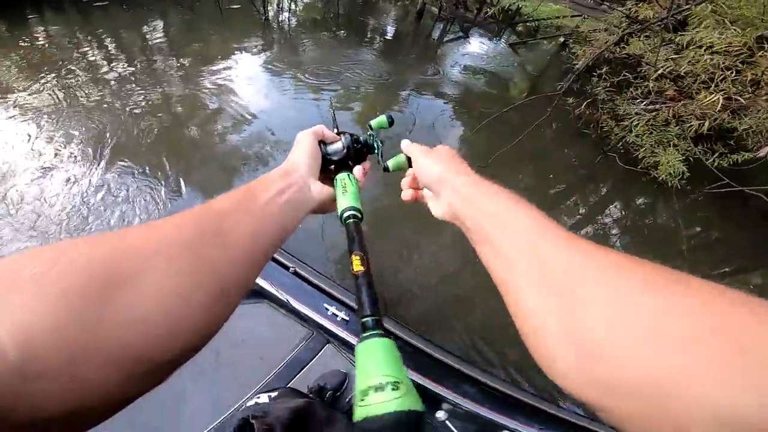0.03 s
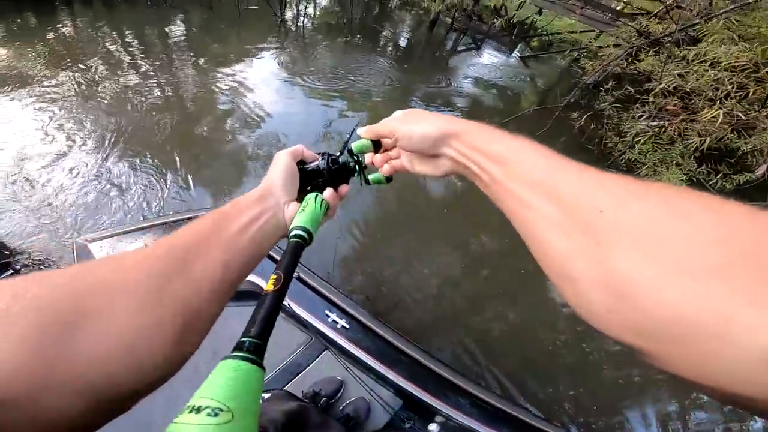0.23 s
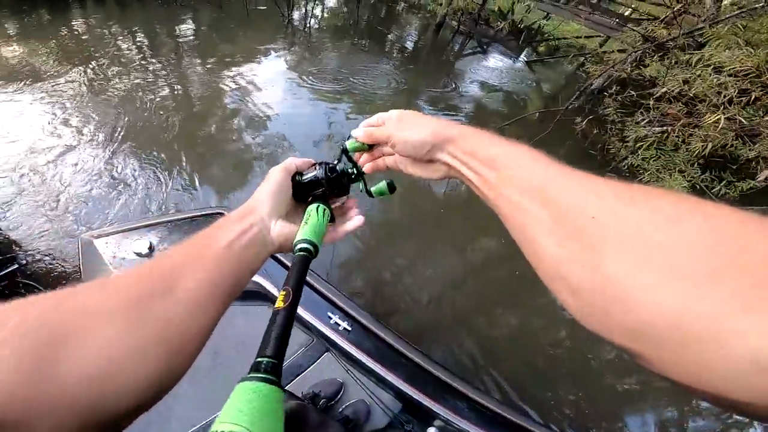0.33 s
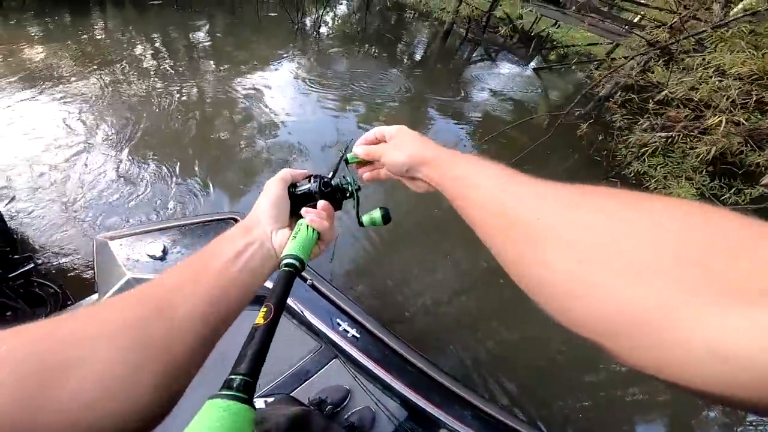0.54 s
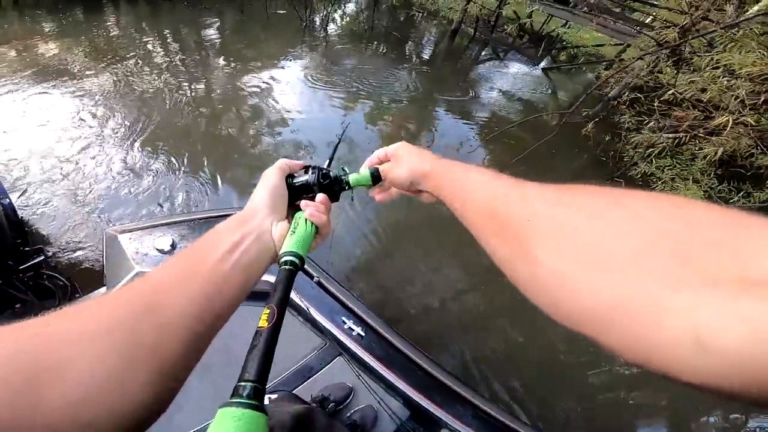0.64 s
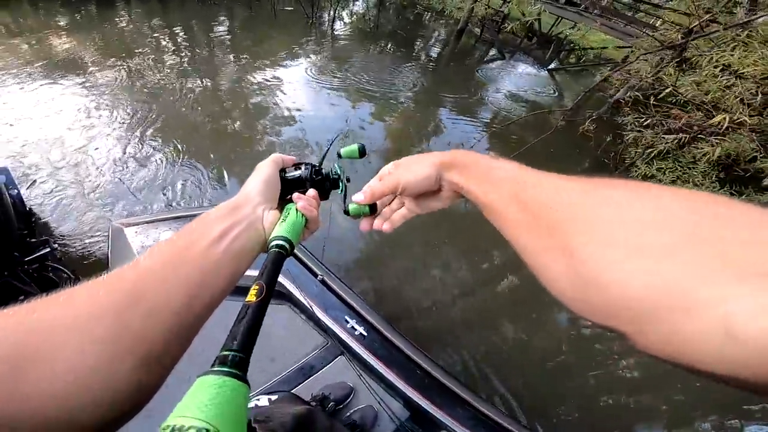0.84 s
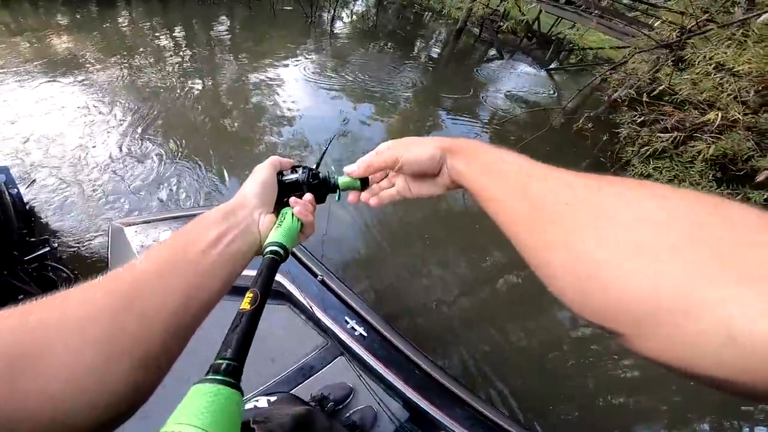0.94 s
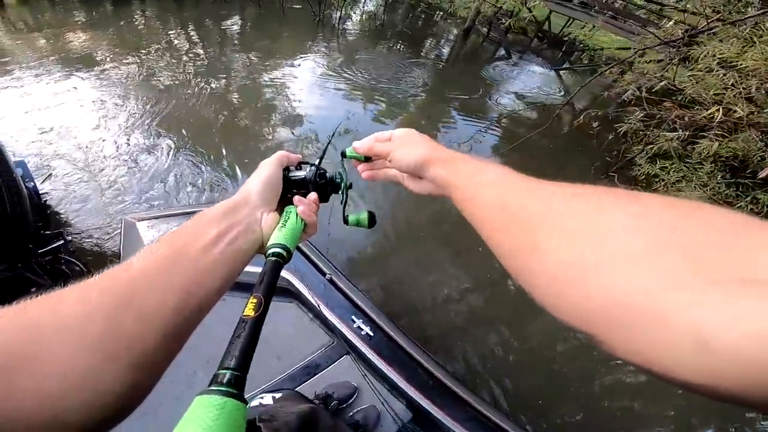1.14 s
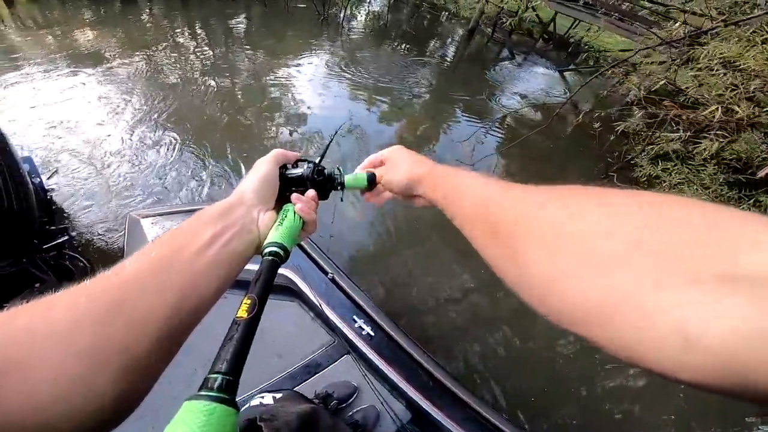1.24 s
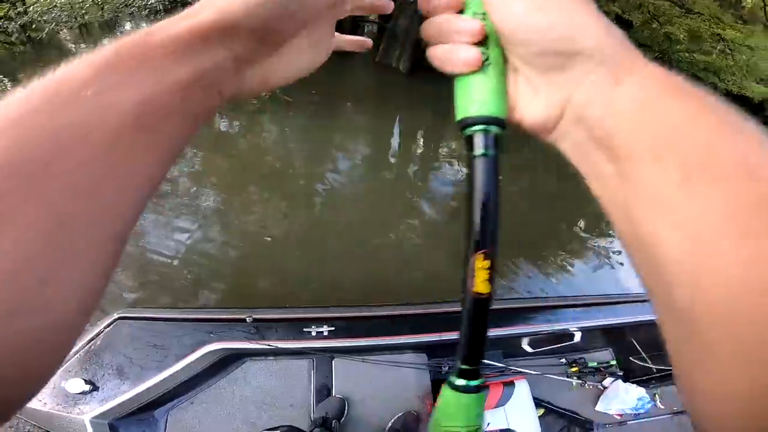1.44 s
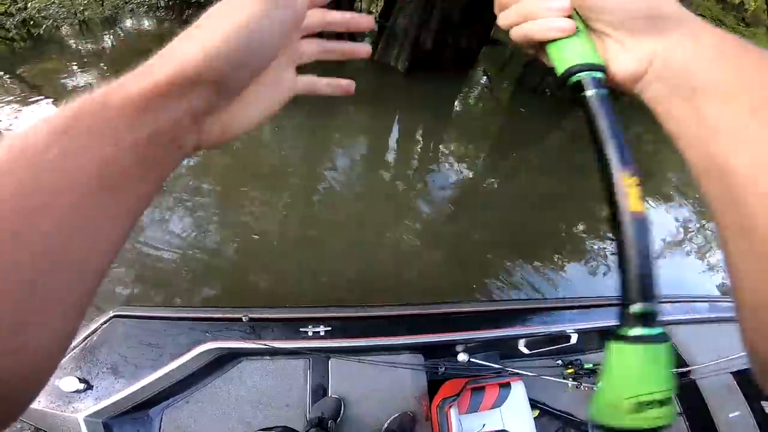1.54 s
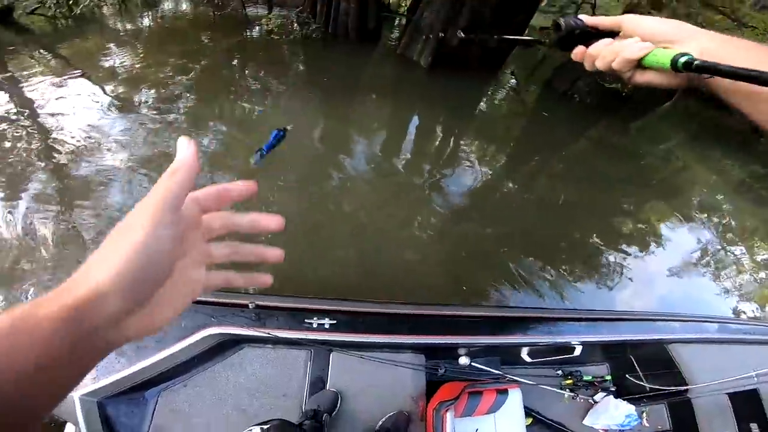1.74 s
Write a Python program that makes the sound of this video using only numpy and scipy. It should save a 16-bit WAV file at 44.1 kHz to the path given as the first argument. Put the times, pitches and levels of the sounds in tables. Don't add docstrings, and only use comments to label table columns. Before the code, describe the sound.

Fishing reel and rod handling, close and dry. A small click and plastic scrape at 0.12 s, a loud metallic clutch snap at 0.24, then a duller knock with a low thump at 0.30. Faint line ticks and tiny water blips follow from 0.7 to 1.4, with soft hand rubbing near 1.35. A hard lure clacks and rattles at 1.49. Underneath: very quiet hum, cloth rustle, distant cicadas, cricket trills from 0.87.

```python
import sys
import numpy as np
from scipy import signal
from scipy.fft import rfft, irfft, next_fast_len
from scipy.io import wavfile
from scipy.ndimage import uniform_filter1d, map_coordinates

SR = 44100
rng = np.random.default_rng(int(sys.argv[2]) if len(sys.argv) > 2 else 0)


def wav_record(signal):
    frames = np.transpose(np.atleast_2d(signal))
    bounded = np.clip(frames, -1, 1)
    quanta = np.round(bounded * 32767).astype(np.int16)
    wavfile.write(sys.argv[1], SR, quanta)


def to_linear_factor(level_db):
    exponent = np.asarray(level_db, float) / 20
    return 10 ** exponent


N = 77175

# f/Hz, likeness (1 = same in both)
LIKENESS = [(60, 0.26), (250, 0.27), (600, -.4), (1500, -0.07), (3500, 0.72), (9000, -0.036)]
# f/Hz, level/dB
MIC_RESPONSE = [(9000, -0.5), (12500, -3), (15600, 3), (16500, -36.5)]
# f/Hz, level/dB per Hz
AIR_COLOUR = [(200, -4.5), (570, -16), (5400, -16), (9000, -17.5), (11400, -36)]
# f/Hz, level/dB per Hz
RUMBLE_COLOUR = [(20, -2), (60, -1), (110, -1)]
# t/s, level/dB
SLEEVE_LEVEL = [(0, -48.5), (.05, -61.5), (.1, -60), (.2, -63), (.27, -57), (.38, -64), (.47, -73.5),
                (.68, -68.5), (.8, -62), (.98, -63.5), (1.15, -63), (1.33, -60), (1.45, -59.5),
                (1.56, -64.5), (1.66, -70.5), (1.75, -72.5)]
# f/Hz, level/dB per Hz
CLOTH_COLOUR = [(300, -5.5), (1050, -1), (1600, 1.5), (2300, -2), (4200, -3), (6000, -13), (10000, -11.5),
                (13500, -31.5)]
# t/s, level/dB
HUM_LEVEL = [(0, -56.5), (.2, -62.5), (.32, -59), (.41, -61), (.49, -67), (.6, -65), (.74, -70.5),
             (.87, -71.5), (.96, -61), (1.06, -65.5), (1.24, -65), (1.32, -74.5), (1.38, -54),
             (1.53, -57.5), (1.62, -56), (1.75, -65.5)]
# f/Hz, level/dB
HULL_TONES = [(77, -17.5), (154, 0.5)]
# f/Hz, level/dB per Hz
DRONE_COLOUR = [(170, -2), (270, -7), (400, -18), (800, -15)]
# t/s, level/dB
CHORUS_LEVEL = [(0, -57), (1.37, -58), (1.75, -64)]
# f/Hz, width/Hz, level/dB
CICADA_BANDS = [(6828, 610, 4), (7530, 440, -4.5)]
# first pulse t/s, last pulse t/s, peak level/dB, f/Hz
CRICKET_PHRASES = [(0.871, 0.939, -65, 4220), (0.971, 1.085, -64, 4210), (1.122, 1.172, -63, 4310),
                   (1.187, 1.241, -61.5, 4260), (1.265, 1.335, -58.5, 4280), (1.355, 1.479, -57.5, 4350),
                   (1.527, 1.582, -60.5, 4370), (1.598, 1.652, -57.5, 4380), (1.684, 1.754, -58, 4300)]
# t/s, peak level/dB, first f/Hz, last pitch over first, length/s
WATER_DROPS = [(0.724, -64, 1536, 0.856, .025), (0.789, -67.5, 883, 2.1, 0.096),
               (1.073, -63.5, 906, 0.91, 0.026), (1.147, -59.5, 774, 2.93, 0.0294),
               (1.544, -57.5, 1002, 1.07, 0.025), (1.468, -55, 1700, 1.02, .009),
               (1.476, -46, 1600, 1.08, .009), (1.484, -48, 1680, 1.01, .01),
               (1.503, -47.5, 640, 1.02, .012)]
# t/s, peak level/dB, f/Hz, time to fall 60 dB/s
BODY_BUMPS = [(0.245, -44, 58, 0.16), (0.298, -33.5, 77.7, 0.067), (.300, -24, 194, 0.016),
              (0.746, -58, 36, 0.13), (1.0, -49, 32, 0.082), (1.211, -55, 74.5, 0.51),
              (1.259, -43.5, 51.7, 0.13), (1.582, -58.5, 80, 0.23), (0.241, -38, 200, 0.06),
              (.245, -39.5, 270, .03), (.1, -61, 45, .2), (0.162, -59, 52, 0.16)]
# t/s, level/dB
RUB_LEVEL = [(1.22, -85), (1.28, -68.5), (1.33, -59), (1.37, -60.5), (1.385, -75), (1.4, -57),
             (1.43, -66.5), (1.45, -87)]
# t/s, level/dB, time to fall 60 dB/s, centre f/Hz
SCRAPES = [(.1245, -48, 0.066, 2500), (0.1307, -40.5, 0.044, 3170), (0.144, -47, 0.026, 3100),
           (0.14, -57, .05, 3024), (1.9, -61, 0.018, 4630), (2.2, -56.5, .02, 3400),
           (.2210, -44, 0.019, 3290), (.2235, -46.5, 0.026, 3600), (.2315, -56.5, 0.042, 3000),
           (0.246, -31, 0.018, 2980), (.25, -54, 0.22, 9000), (.259, -46, 0.041, 3000),
           (0.274, -57, 0.11, 4000), (0.294, -45, 0.034, 2300), (1.324, -54, 0.07, 2800),
           (.131, -50, 0.082, 690), (1.41, -59, 0.067, 705), (1.456, -47, 0.019, 3300),
           (1.4649, -39.5, 0.018, 2600), (1.4843, -35, 0.025, 2800), (1.498, -39.5, 0.06, 2200),
           (1.31, -63, 0.095, 240), (.81, -58.5, 0.066, 260)]
# t/s, peak level/dB; the first line row at 0.2423 s is a bright click leading into the
LINE_HITS = [(.2423, -10.5), (.794, -40.5), (.835, -36.5), (.903, -45.5), (.914, -38), (.946, -38.5),
             (1.038, -40), (1.282, -47), (1.268, -47), (1.340, -39), (1.390, -41)]
TAP_HITS = [(.1428, -36), (.1737, -44.5), (.2320, -32.5), (1.0945, -38), (1.3255, -45.5), (1.4649, -42)]
PAWL_HITS = [
    (.1229, -20.5),
]
MOUNT_HITS = [
    (.2991, -15),
    (.3008, -26),
    (.9230, -42),
    (1.3960, -39),
]
LURE_HITS = [
    (1.4846, -32.5),
    (1.4949, -8.5),
    (1.4955, -3.5),
    (1.4980, -18.5),
    (1.5004, -19.5),
]
CLUTCH_HITS = [
    (.2412, -19.5),
    (.2419, -21),
    (.2436, -3.5),
    (.2441, 0.5),
    (.2454, -24),
    (.2472, -31),
    (.2493, -28),
]
# f/Hz, level/dB, time to fall 60 dB/s
LINE_TONES = [(4220, 2.5, 0.0038), (6120, 6.5, 0.0026), (8760, 15, 0.0019), (11340, -12.5, 0.03)]
TAP_TONES = [(1530, -1.5, .008), (2200, -2.5, 0.016), (2900, -1, 0.0029), (3600, -1, .005),
             (4700, -6.5, .003)]
PAWL_TONES = [(1385, -16.5, 0.035), (2610, 3, 0.0086), (3600, 7, 0.0024), (4300, 13, 0.0028),
              (5940, 1, 0.0027)]
MOUNT_TONES = [(1310, -3.5, 0.034), (1630, 6, 0.0097), (2570, -4, 0.01), (2930, -5.5, 0.012),
               (3900, 5.5, 0.0036), (4900, 6, 0.0038), (7400, -3, 0.0036)]
LURE_TONES = [(650, -8, 0.01), (740, -31.5, 0.1), (850, -22.5, 0.0028), (1061, -31.5, 0.055),
              (1590, -39.5, 0.1), (1787, -9, 0.0067), (2630, -19.5, .012), (3356, 11, 0.0031),
              (3710, -14, 0.028), (4910, -5, 0.0038), (7233, -9.5, 0.02), (8850, -0.5, 0.0051),
              (10480, -5.5, 0.005), (14000, -15, 0.0033)]
CLUTCH_TONES = [(741, -35, 0.087), (1390, -22.5, 0.026), (2010, -12.5, 0.009), (2490, -14, 0.01055),
                (3000, -8.5, 0.015), (3900, -1, 0.0076), (4730, 14, 0.0043), (5200, 5.5, 0.0039),
                (7040, 6, 0.0047), (9290, -4, 0.0036), (13840, -6.5, 0.004)]


def unit(x):
    return x / np.sqrt(np.mean(x ** 2) + 1e-20)


def along(points, hz):
    f, v = np.transpose(points)
    return np.interp(np.log(hz + 1), np.log(f + 1), v)


def closed(points):
    low_end, high_end = (points[0][0] / 2, -60), (points[-1][0] * 1.2, -90)
    return lambda f: to_linear_factor(along([low_end] + list(points) + [high_end], f))


def bell(f, centre_hz, width_hz):
    return 1 / (1 + (2 * (f - centre_hz) / width_hz) ** 2)


def curve(rows):
    return np.interp(np.arange(N) / SR, *np.transpose(rows))


def wobble(rate):
    knots = rng.standard_normal(int(N * rate / SR) + 4)
    return map_coordinates(knots, [np.arange(N) * rate / SR])


def two_sides(angle):
    return np.array([[angle], [-angle]])


def add(out, s, sound):
    part = out[:, round(s * SR):][:, :sound.shape[-1]]
    part += sound[..., :part.shape[1]]


def rush(gain, patchy_db):
    z = signal.stft(rng.standard_normal((2, N)), nperseg=256)[2]
    field = uniform_filter1d(rng.standard_normal(z.shape[1:]), 4, 0)
    field = uniform_filter1d(field, 8, 1)
    pair = signal.istft(z * to_linear_factor(patchy_db * unit(field)), nperseg=256)[1][:, :N]
    m = next_fast_len(N + 8192)
    hz = np.fft.rfftfreq(m, 1 / SR)
    turn = np.arccos(np.clip(along(LIKENESS, hz), -1, 1)) / 2
    shares = [np.cos(turn), np.sin(turn)]
    mid, side = irfft(rfft(pair, m) * gain(hz) * shares, m)[:, :N]
    return unit(np.array([mid + side, mid - side]))


def struck(contacts, modes, turn, lag_s, pan_db, crack, attack_s, bass_hz, dull=False):
    out, t = np.zeros((2, N)), np.arange(SR // 8) / SR
    hz, db, t60 = np.transpose(modes)[:, :, None]
    signs = (-1) ** np.arange(len(modes))[:, None]
    chance = rng.standard_normal((len(contacts), 3, len(modes), 1))
    snaps = uniform_filter1d(rng.standard_normal((len(contacts), 2, len(t))), size=3)
    for (s, peak_db), (size, tune, skew), snap in zip(contacts, chance, snaps):
        apart = (turn + 2 * np.pi * hz * lag_s * (1 + 0.69 * skew)) / 2
        phase = 2 * np.pi * hz * (1 + 0.008 * tune) * t
        shape = signs * to_linear_factor(db + size - 60 * t / t60) * (1 - np.exp(-t / attack_s))
        ring = np.array([(shape * np.sin(phase + side * apart)).sum(0) for side in (1, -1)])
        ring = ring / np.abs(ring).max()
        add(out, s, to_linear_factor(peak_db) * (ring + crack * to_linear_factor(-60 * t / 0.031) * snap))
    out = signal.sosfilt(signal.butter(2, bass_hz, 'high', fs=SR, output='sos'), out)
    if dull:
        out = signal.sosfilt(signal.butter(2, 12200, fs=SR, output='sos'), out)
    return out * to_linear_factor([[pan_db / 2], [-pan_db / 2]])


def air():
    return to_linear_factor(-68.5) * rush(closed(AIR_COLOUR), patchy_db=5.0)


def wind_rumble():
    return to_linear_factor(-79.5 + 4.0 * wobble(36.0)) * rush(closed(RUMBLE_COLOUR), patchy_db=0.5)


def hull_hum():
    t = np.arange(N) / SR
    tones = 0
    for hz, db in HULL_TONES:
        level = to_linear_factor(db + 2.7 * wobble(21))
        tones = tones + level * np.sin(2 * np.pi * hz * t + 0.7 * wobble(13) + two_sides(.2))
    drone = to_linear_factor(-4) * rush(closed(DRONE_COLOUR), patchy_db=3.0)
    return to_linear_factor(curve(HUM_LEVEL)) * (tones + drone)


def cicadas():
    def song(f):
        return sum(to_linear_factor(db) * bell(f, hz, width) for hz, width, db in CICADA_BANDS)
    return to_linear_factor(curve(CHORUS_LEVEL) + 1.6 * wobble(140)) * rush(song, patchy_db=-1.0)


def cricket():
    pulse_gap_s, pulse_s, fall_hz = .0175, 0.012, 559
    out, u = np.zeros((2, N)), np.linspace(-.5, .5, round(pulse_s * SR))
    for first, last, db, hz in CRICKET_PHRASES:
        for s in np.linspace(first, last, round((last - first) / pulse_gap_s) + 1):
            size, tune = rng.standard_normal(2)
            phase = 2 * np.pi * np.cumsum(hz + 35 * tune - fall_hz * u) / SR
            swell = np.cos(np.pi * u) ** 1.15
            add(out, s - pulse_s / 2, to_linear_factor(db + size) * swell * np.sin(phase + two_sides(.3)))
    return out


def drops():
    out = np.zeros((2, N))
    for s, db, hz, glide, length in WATER_DROPS:
        u = np.arange(round(length * SR)) / (length * SR)
        tone = np.sin(2 * np.pi * np.cumsum(hz * glide ** u) / SR + two_sides(.4))
        flutter = unit(uniform_filter1d(rng.standard_normal(len(u)), size=90))
        add(out, s, to_linear_factor(db + 3 * flutter) * np.sin(np.pi * u ** 0.89) * tone)
    return out


def sleeves():
    level = curve(SLEEVE_LEVEL) + 0.89 * wobble(59.43) + 0.49 * wobble(410)
    return to_linear_factor(level) * rush(closed(CLOTH_COLOUR), patchy_db=3)


def bumps():
    out, t = np.zeros((2, N)), np.arange(SR // 4) / SR
    for s, db, hz, t60 in BODY_BUMPS:
        shape = to_linear_factor(db - 60 * t / t60) * (1 - np.exp(-t * hz * 3))
        add(out, s, shape * np.sin(2 * np.pi * hz * t + two_sides(.3)))
    return out


def hand_rub():
    def blank(f):
        return bell(f, 1550, 390)
    return to_linear_factor(curve(RUB_LEVEL) + 4.1 * wobble(90)) * rush(blank, patchy_db=1.5)


def scuffs():
    width_octaves, ragged_db, top_hz = 0.73, 3.5, 10000
    out, t = np.zeros((2, N)), np.arange(SR // 3) / SR
    hz = np.fft.rfftfreq(len(t), 1 / SR) + 1
    for s, db, t60, centre_hz in SCRAPES:
        a, b, grit = rng.standard_normal((3, len(t)))
        ragged = to_linear_factor(ragged_db * unit(uniform_filter1d(grit, size=30)))
        colour = 1 / (1 + (np.log2(hz / centre_hz) / width_octaves) ** 2) ** 1.4
        colour = colour / (1 + (hz / top_hz) ** 6)
        pair = ragged * np.array([a + 0.27 * b, a - 0.36 * b])
        burst = unit(irfft(rfft(pair) * colour, len(t)))
        add(out, s, to_linear_factor(db - 60 * t / t60) * (1 - np.exp(-t / 0.00027)) * burst)
    return out


def line_ticks():
    return struck(LINE_HITS, LINE_TONES, turn=0, lag_s=3e-5, pan_db=-1.0, crack=0.36,
                  attack_s=0.00005, bass_hz=2500, dull=True)


def light_taps():
    return struck(TAP_HITS, TAP_TONES, turn=0, lag_s=2e-5, pan_db=3.5, crack=0.12,
                  attack_s=.0004, bass_hz=900, dull=True)


def pawl_click():
    return struck(PAWL_HITS, PAWL_TONES, turn=0, lag_s=2e-5, pan_db=-0.5, crack=0.17,
                  attack_s=2e-4, bass_hz=1400, dull=True)


def mount_knock():
    return struck(MOUNT_HITS, MOUNT_TONES, turn=2.03, lag_s=0, pan_db=0.0, crack=0.056,
                  attack_s=0.00045, bass_hz=700)


def lure_clack():
    return struck(LURE_HITS, LURE_TONES, turn=0, lag_s=1.5e-5, pan_db=1.5, crack=0.075,
                  attack_s=2e-4, bass_hz=420)


def clutch_snap():
    return struck(CLUTCH_HITS, CLUTCH_TONES, turn=0, lag_s=2.8e-5, pan_db=1.5, crack=0.0546,
                  attack_s=0.00054, bass_hz=690)


def scene():
    knocks = pawl_click() + light_taps() + clutch_snap() + mount_knock() + lure_clack() + line_ticks()
    near = scuffs() + bumps() + drops() + hand_rub()
    around = cricket() + cicadas() + hull_hum() + sleeves() + wind_rumble() + air()
    return knocks + near + around


def roll_off(x):
    return signal.sosfilt(signal.butter(12, 16640, fs=SR, output="sos"), x)


def record(dry):
    m = next_fast_len(N + 8192)
    response = to_linear_factor(along(MIC_RESPONSE, np.fft.rfftfreq(m, 1 / SR)))
    heard = irfft(rfft(dry, m) * response, m)[:, :N]
    return roll_off(heard)


dry = scene()
out = record(dry)
wav_record(out)
```